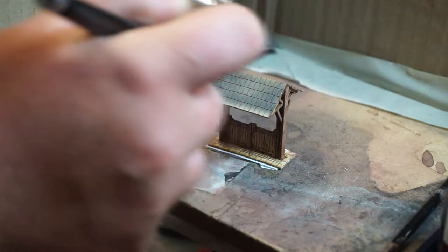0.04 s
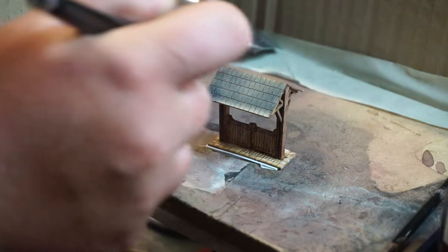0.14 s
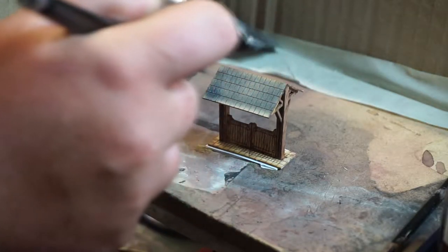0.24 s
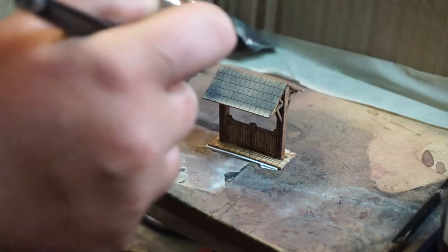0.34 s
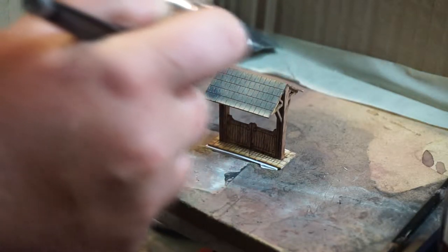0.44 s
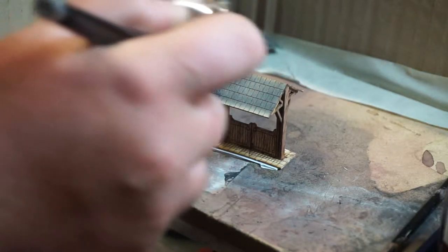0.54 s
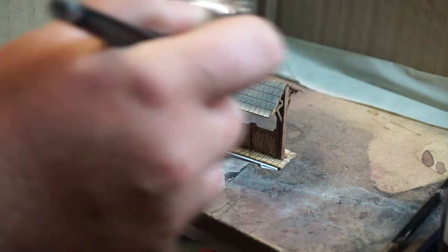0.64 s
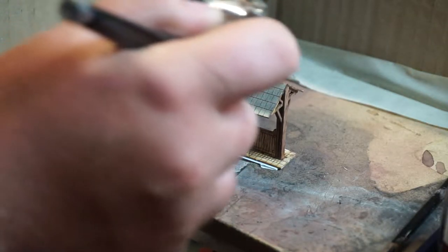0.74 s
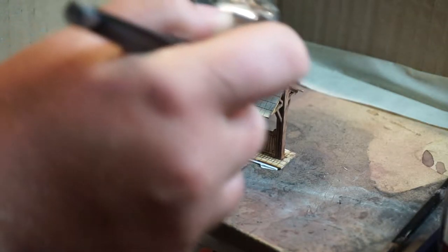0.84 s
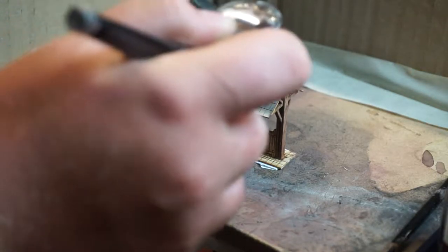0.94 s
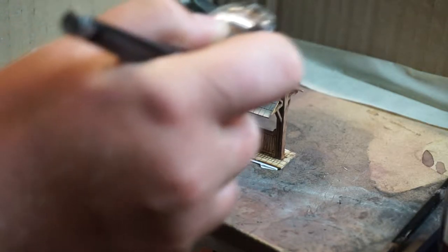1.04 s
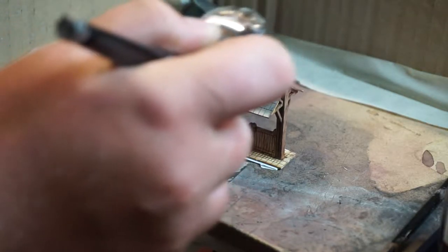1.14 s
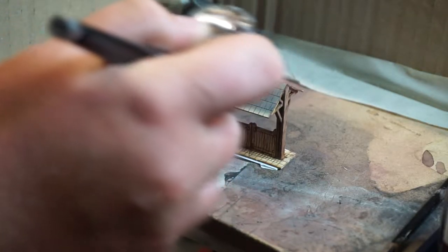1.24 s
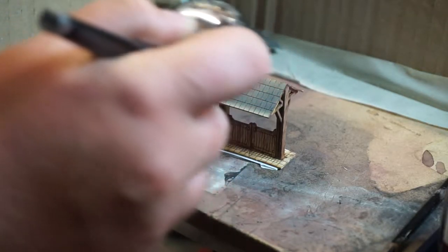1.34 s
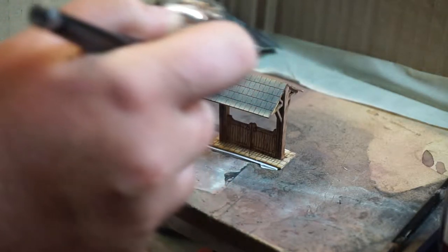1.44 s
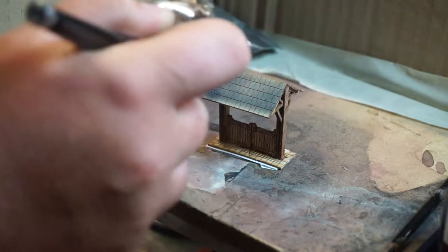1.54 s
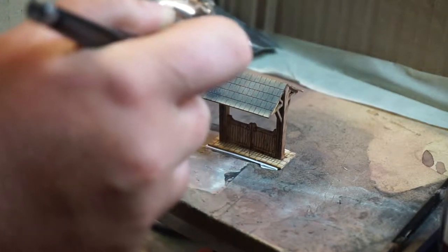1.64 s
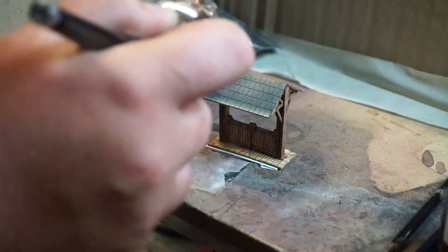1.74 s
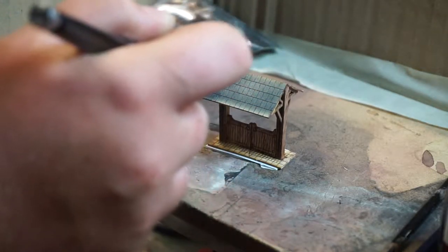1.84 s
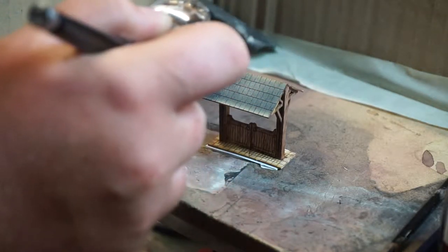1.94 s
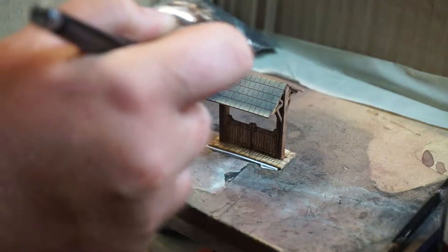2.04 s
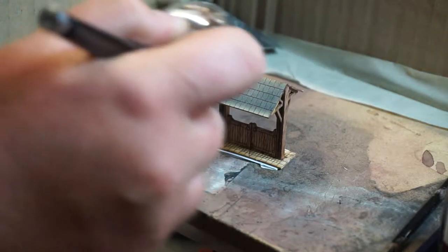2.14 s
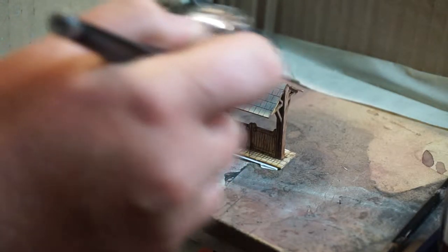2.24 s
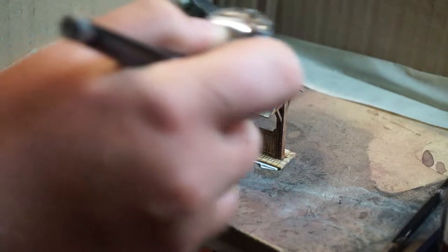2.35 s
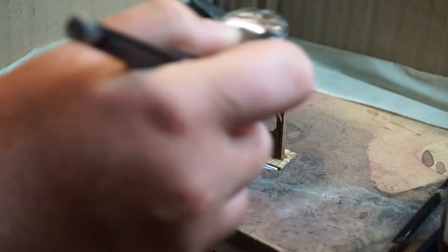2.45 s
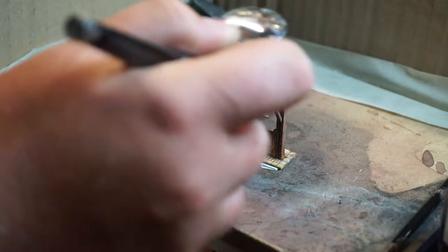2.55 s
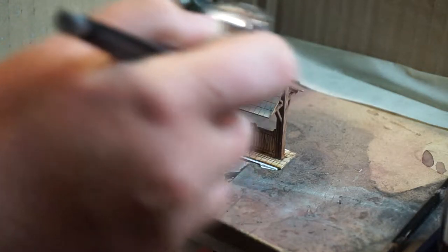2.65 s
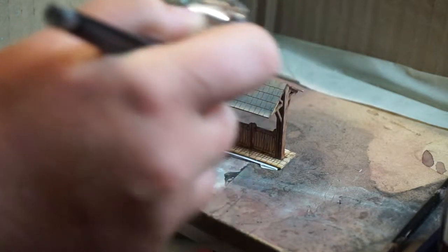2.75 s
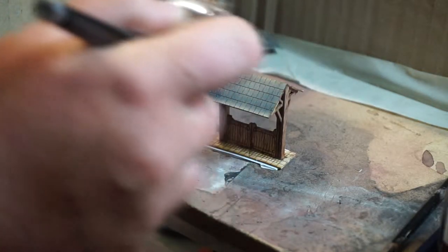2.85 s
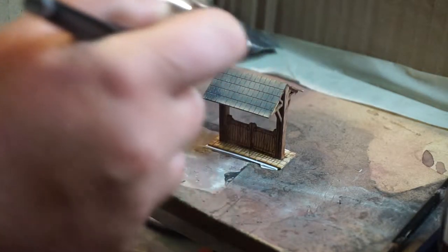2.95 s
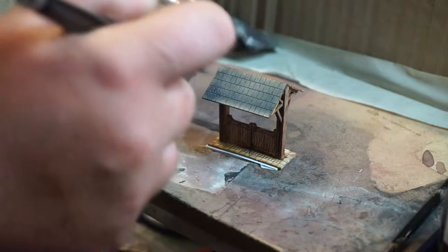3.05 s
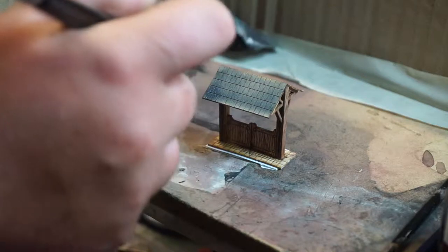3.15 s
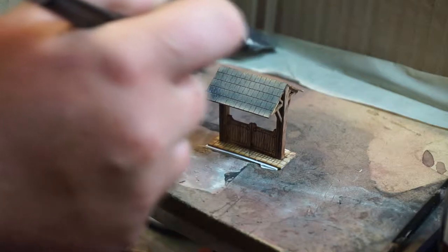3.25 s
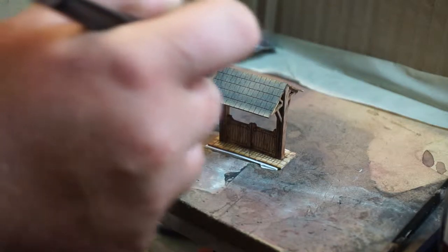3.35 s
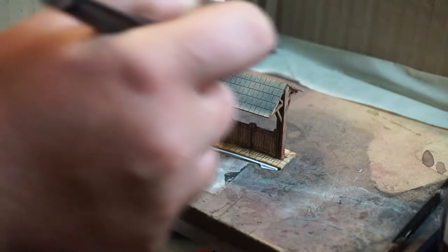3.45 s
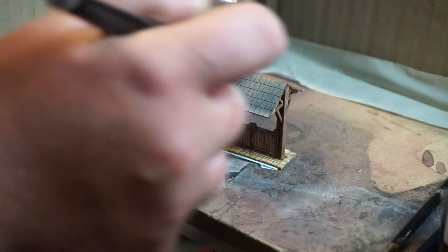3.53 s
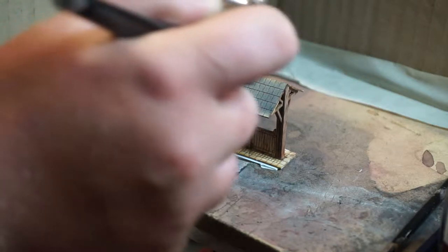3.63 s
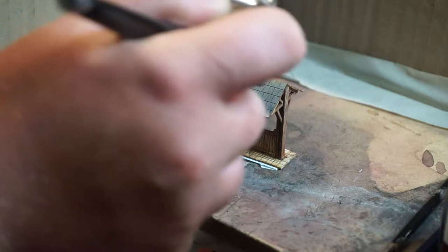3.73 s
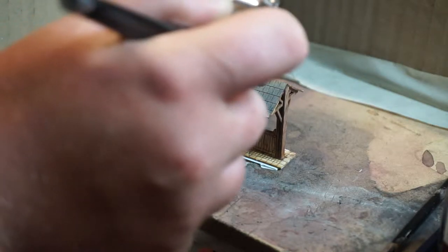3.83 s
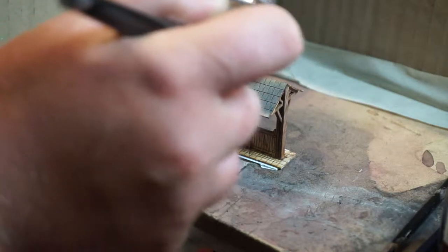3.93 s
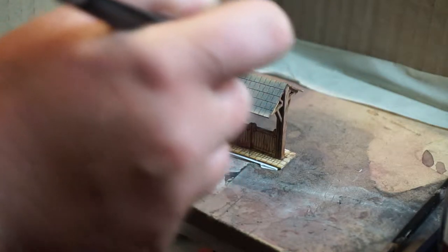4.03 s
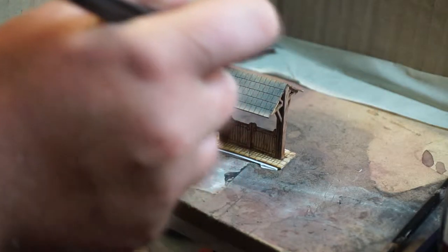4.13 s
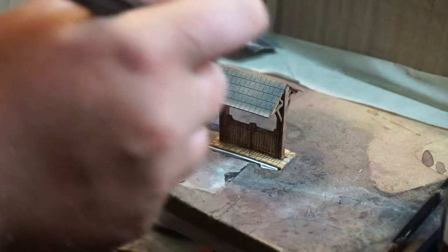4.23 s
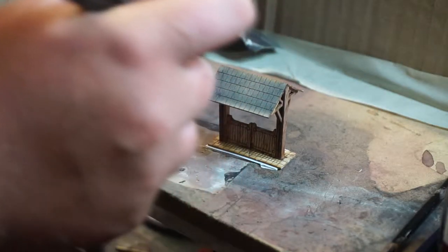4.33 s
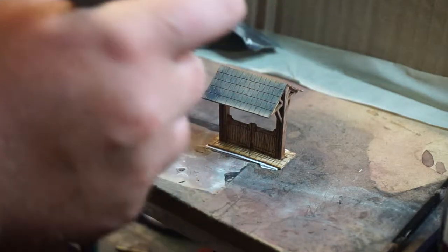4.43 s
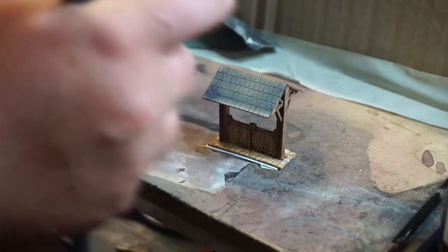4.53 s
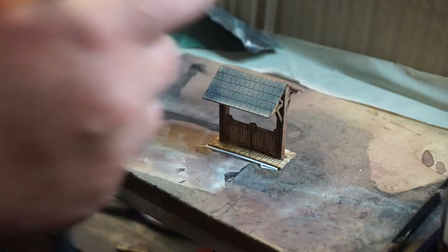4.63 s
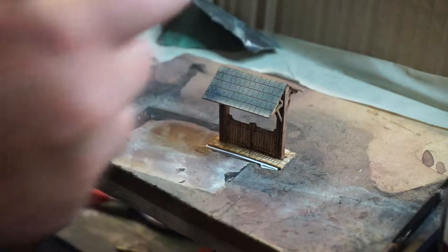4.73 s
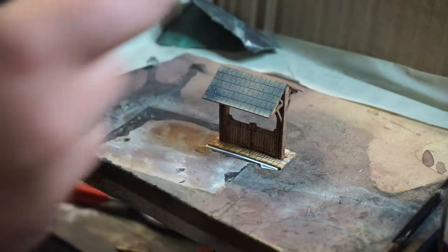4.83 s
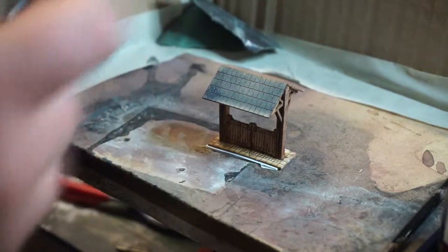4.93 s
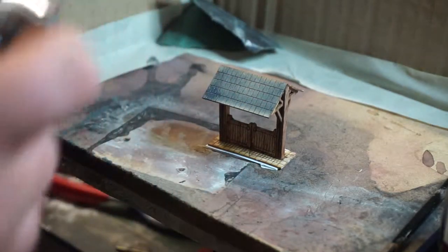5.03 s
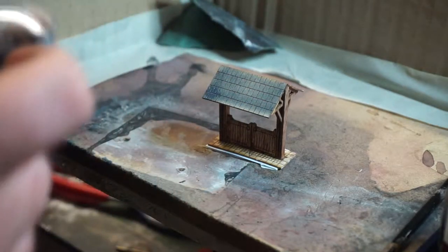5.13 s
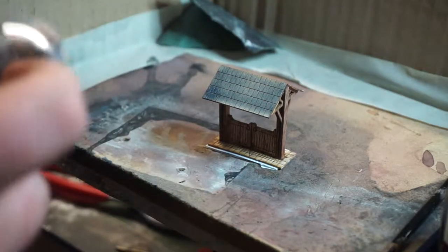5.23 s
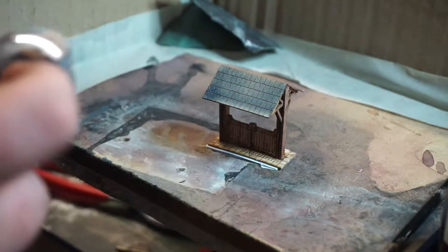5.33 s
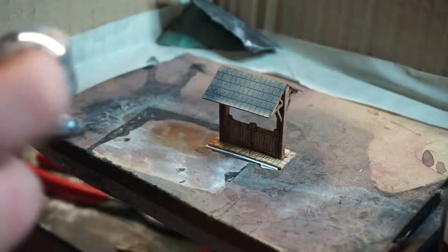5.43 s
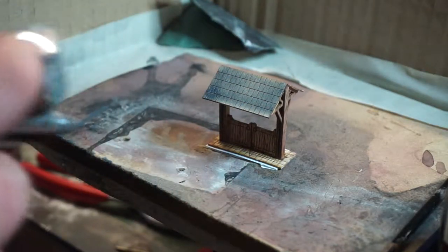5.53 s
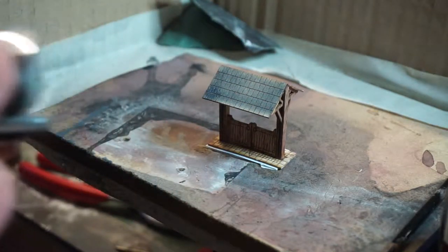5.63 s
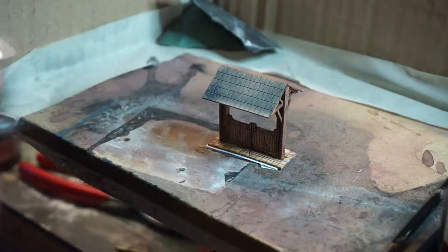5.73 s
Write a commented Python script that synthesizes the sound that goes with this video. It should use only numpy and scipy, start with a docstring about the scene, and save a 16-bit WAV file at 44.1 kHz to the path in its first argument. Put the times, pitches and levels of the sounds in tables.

```python
"""An airbrush paints a small model on a hobby bench, with a piston compressor humming a little to the right.
The jet is coloured noise that flares where it strikes the model and throbs with the piston; walls echo it.
The pump is a sum of shaft harmonics. The trigger is let go, the pump labours against the closed line,
its pressure switch snaps, a relief valve chirps and bleeds, and the motor coasts down over a quiet room."""
import sys
import numpy as np
from scipy import signal
from scipy.fft import rfft, irfft
from scipy.io import wavfile

SR = 44100
rng = np.random.default_rng(int(sys.argv[2]) if len(sys.argv) > 2 else 0)


def transcribe(signal):
    """Save signal, clipped to [-1, 1], as a 16-bit WAV file at the path in sys.argv[1]."""
    frames = np.atleast_2d(signal).T
    limited = np.clip(frames, -1, 1)
    pcm = np.round(limited * 32767).astype(np.int16)
    wavfile.write(sys.argv[1], SR, pcm)


N = 254898
T = np.arange(N) / SR  # time, s
HZ = np.maximum(np.arange(N // 2 + 1) * SR / N, 1)  # frequencies of the noise spectra

CUTOUT_S = 4.857  # relief valve opens and motor starts to coast
# compressor: (time [s], shaft speed [Hz], level [dB])
PUMP = [(0.03, 57.94, -39), (2.11, 58, -38), (4.57, 58.09, -38), (4.84, 57.2, -35.5)]
# likeness of the machine and room noise at the left and right microphones: (frequency [Hz], likeness [0-1])
LOW_LIKENESS = [(60, 0.85), (250, 0.82), (600, .6), (1100, .35), (3000, .4)]


def undb(db):
    """Decibels to gain."""
    return 10 ** (np.asarray(db) / 20)


def unit(x):
    """Scale to rms 1."""
    return x / np.sqrt(np.mean(x ** 2))


def curves(rows):
    """The columns of a time table, sample by sample."""
    s, *columns = np.transpose(rows)
    return [np.interp(T, s, column) for column in columns]


def across(rows, hz):
    """The columns of a frequency table at the given frequencies, interpolated over log frequency."""
    f, *columns = np.transpose(rows)
    return [np.interp(np.log(hz), np.log(np.maximum(f, 1)), column) for column in columns]


def colour(rows):
    """Gain over frequency of a (frequency [Hz], relative level [dB]) spectrum."""
    return undb(across(rows, HZ)[0])


def resonances(rows):
    """Gain over frequency of steep-sided resonances that add in power."""
    power = 0
    for f, width, db in rows:
        detuning = (HZ ** 2 - f ** 2) / (HZ * width) / 2
        power = power + (undb(db) / (1 + detuning ** 2)) ** 2
    return np.sqrt(power)


def noise(gain, likeness):
    """Stereo noise of a given colour; the part common to both microphones has rms 1."""
    alike = np.clip(likeness, 0, .99)
    mid, side = rfft(rng.standard_normal((2, N))) * gain
    mid = irfft(mid, N)
    side = irfft(side * np.sqrt((1 - alike) / (1 + alike)), N)
    return np.array([mid + side, mid - side]) / np.std(mid)


def walk(rate):
    """Smooth chance of rms 1 that changes about rate times a second."""
    return unit(irfft(rfft(rng.standard_normal(N)) / (1 + (HZ / rate) ** 4), N))


def step(at_s, over_s):
    """A smooth rise from 0 to 1."""
    return .5 + .5 * np.tanh((T - at_s) / over_s)


def bell(x, centre, width):
    """A smooth hump of height 1."""
    return np.exp(-((x - centre) / width) ** 2)


def burst(at_s, decay_s):
    """A quick attack and an exponential tail."""
    return step(at_s, 0.0011) * np.exp(-np.maximum(T - at_s, 0) / decay_s)


def throb(turns, depth_db):
    """A gain of rms 1 that swells once a turn."""
    return unit(undb(depth_db * np.cos(2 * np.pi * turns)))


def airbrush(turns):
    """A bright free jet, and turbulence where it hits model and board; piston strokes ripple ring and wash."""
    # hollows of the model: (centre [Hz], width [Hz], relative level [dB])
    hollows = [(2150, 470, -5.5), (2410, 230, 1.5), (2790, 160, -2)]
    # air washing over the model's faces: (frequency [Hz], relative level [dB])
    wash_spectrum = [(700, -11), (1350, -11), (2300, -8), (3400, -1), (3950, -5.5), (4300, -1.5),
                     (4750, -2), (5200, 2.5), (5620, -1.5), (5790, 4), (5950, -5), (7200, -2.5), (9100, -3),
                     (10200, -11)]
    # free jet at the nozzle: (frequency [Hz], relative level [dB])
    nozzle = [(1500, -20), (4000, -16), (6500, -8.5), (8400, -1.5), (9700, 1), (10300, -1), (11000, 1.5)]
    # likeness of the air noise at the left and right microphones: (frequency [Hz], likeness [0-1])
    air_likeness = [(600, .7), (1200, 0.1), (2450, 1), (3250, 0.4), (4300, 0.3), (5400, 0.78), (7500, 0.7),
                    (11000, 0.18)]
    # resonance of the spill on the board: (centre [Hz], width [Hz], relative level [dB])
    board = [(1714, 290, 0)]
    # surges of the free jet as the trigger is pulled further: (time [s], half length [s], rise [dB])
    surges = [(2.097, 0.17, 3.3), (4.22, 0.11, 7.5)]
    release_s = 4.628  # trigger let go
    likeness, = across(air_likeness, HZ)
    ring_gain, wash_gain = contact()
    ripple = throb(turns - .15, depth_db=1.0)
    flutter = walk(35)
    # levels are those of the direct air, ahead of the booth
    ring = noise(resonances(hollows), likeness) * ring_gain * undb(-2.4 + .7 * flutter) * ripple
    wash = noise(colour(wash_spectrum), likeness) * wash_gain * undb(1.0 + .64 * flutter) * ripple
    # the spill grows .35 dB for each dB of ring
    spill = noise(resonances(board), likeness) * ring_gain ** .35 * undb(-36 + 1.2 * flutter)
    surge_db = sum(db * bell(T, s, length) for s, length, db in surges)
    jet = noise(colour(nozzle), likeness) * undb(-38.5 + surge_db + .46 * walk(22))
    return (ring + wash + spill + slips(likeness) + jet) * (1 - step(release_s, 0.0072))


def contact():
    """How hard the jet plays on the model, as gains of ring and wash: passes and flares add in power."""
    # passes across the model, levels before the trims in airbrush:
    # (onto it [s], off it [s], wash over its faces [dB], ring of its hollows above the wash [dB])
    passes = [(-0.1, 0.264, -43.5, 6.5), (0.426, 0.956, -45.6, 8), (1.041, 2.415, -42.5, 7),
              (2.638, 3.038, -45, 7.5), (3.268, 4.394, -44.0, 5.3)]
    # flares as the jet meets a part squarely, levels before the same trims:
    # (time [s], half length [s], wash [dB], ring above the wash [dB])
    flares = [(0.2, 0.021, -36, 5.5), (0.484, 0.019, -34, 3.5), (0.871, 0.027, -39, 8.0),
              (1.048, 0.08, -46.5, 10), (1.292, 0.11, -37.5, 4), (1.562, 0.094, -41.5, 3.5),
              (1.905, 0.095, -37.5, 0), (2.21, 0.11, -31, 4.5), (2.984, 0.019, -38, 7.1),
              (3.328, 0.02, -40.5, 12), (3.734, 0.023, -47.5, 13.5), (4.205, 0.1, -37.0, 2.9)]
    edge_s = .021  # time the jet takes to cross an edge of the model
    touches = []
    for on, off, db, ring_db in passes:
        touches.append((step(on, edge_s) * (1 - step(off, edge_s)) * undb(db), ring_db))
    for s, length, db, ring_db in flares:
        touches.append((np.sqrt(bell(T, s, length)) * undb(db), ring_db))
    ring = np.sqrt(sum((gain * undb(ring_db)) ** 2 for gain, ring_db in touches))
    wash = np.sqrt(sum(gain ** 2 for gain, _ in touches))
    # a little air still grazes the model between passes
    return np.hypot(ring, undb(-56)), np.hypot(wash, undb(-51.8))


def slips(likeness):
    """The jet slips past the model: short, hollow roars of resonant noise on the bare board."""
    # roars, levels ahead of the booth: (time [s], half length [s], level [dB], centre [Hz])
    roars = [(0.78, .2, -50, 1330), (0.87, .03, -43, 1700), (1.08, .06, -42, 1680), (2.72, .08, -47, 1380),
             (3.33, .02, -41, 1720), (3.82, .13, -48, 1300)]
    width_hz = 300
    total = 0
    for s, length, db, hz in roars:
        roar = noise(resonances([(hz, width_hz, 0)]), likeness)
        total = total + roar * undb(db) * np.sqrt(bell(T, s, length))
    return total


def booth(air):
    """Echoes off the board and the spray booth walls comb the hiss; the combs drift as the hand moves."""
    # nozzle's height over the board: (time [s], lag of the echo off it [ms])
    hand = [(0, .61), (.9, .635), (2.3, .62), (3.9, .61), (4.6, .56)]
    # walls of the spray booth: (mean lag to the left [ms], mean lag to the right [ms], echo level [dB])
    walls = [(1.55, 1.9, -22), (3.35, 3.6, -20), (5.2, 2.9, -15.5), (7.1, 7.6, -10), (10.3, 9.2, -11),
             (13.4, 14.6, -12.5)]

    def late(channel, ms):
        return np.interp(T - ms / 1000, T, channel)

    board_ms, = curves(hand)
    sway_ms = 0.047 * walk(1.0)
    channels = []
    for side, direct in enumerate(air):
        # the jet radiates with opposite sign towards the board
        heard = direct - undb(-15) * late(direct, board_ms)
        for wall in walls:
            heard = heard + undb(wall[2]) * late(direct, wall[side] + sway_ms)
        channels.append(heard)
    return np.array(channels)


def compressor(turns, level_db):
    """The piston puffs and its valves clatter; the tone hardens once the air has nowhere to go."""
    # pump tone with air flowing: (multiple of the shaft speed, relative level [dB])
    flowing_orders = [(1, 2), (2, -17.5), (3, -13), (4, -8.5), (5, -6.5), (6, -8), (7, -5.5), (8, -15.5),
                      (9, -28), (10, -2), (11, -4), (12, -7), (13, 1), (14, 2), (15, -15.5), (16, -4.5),
                      (17, -13), (18, -18), (19, -7), (20, -18), (21, -14), (22, -15), (23, -20),
                      (24, -13.5)]
    # pump tone against the closed line: (multiple of the shaft speed, relative level [dB])
    blocked_orders = [(1, -3), (2, -34), (3, -22), (4, -18), (5, -16), (6, -8.5), (7, -5), (8, -14),
                      (9, -16.5), (10, -18), (11, -8.5), (12, 2.5), (13, -19), (14, -3.5), (15, -32),
                      (16, -18), (17, -15), (18, -24), (19, -14), (20, -30), (21, -32), (22, -38),
                      (23, -16.5), (24, -20), (25, -20)]
    # valve and casing noise: (frequency [Hz], relative level [dB])
    clatter_spectrum = [(25, -15.5), (60, -7.5), (120, -7), (220, -3), (330, -2.5), (470, -4.5), (650, 0),
                        (860, 2.5), (1050, -3), (1400, -7.5), (1900, -10), (2600, -5.5), (3300, -19),
                        (11000, -26.5)]
    uneven = turns + .0015 * walk(25)
    flowing = pump_tone(flowing_orders, uneven, intake_db=-2, intake_turn=.35,
                        housing_hz=735, housing_width_hz=280, smear=.62)
    blocked = pump_tone(blocked_orders, uneven, intake_db=-4, intake_turn=.42,
                        housing_hz=620, housing_width_hz=270, smear=-.14)
    pressure = step(4.67, 0.013)
    tone = undb(1.0) * ((1 - pressure) * flowing + pressure * blocked)
    stroke_gain = undb(.25 * walk(30))
    clatter = undb(-7.5) * noise(colour(clatter_spectrum), across(LOW_LIKENESS, HZ)[0])
    running = 1 - step(4.88, 0.026)
    return (tone * stroke_gain + clatter) * undb(level_db) * running


def pump_tone(orders, turns, intake_db, intake_turn, housing_hz, housing_width_hz, smear, size=2048):
    """Intake and delivery strokes ring the housing each turn; smear is the treble's extra lag in turns."""
    # where the pump is heard: (frequency [Hz], left minus right [dB], lead of the left [rad])
    pump_place = [(60, 0, 0), (340, 0, 0), (410, -3, 0), (520, -2, -.5), (600, -8, 0), (695, -5, -.7),
                  (755, -1, 1.1), (812, -4, .7), (870, 4, .7), (940, -5, -.2), (1080, -11, -.5),
                  (1300, -2, 0)]
    k, db = np.transpose(orders)
    hz = k * np.mean(np.array(PUMP)[:, 1])
    strokes = 1 + undb(intake_db) * np.exp(2j * np.pi * k * intake_turn)
    # the housing takes a moment to ring up and to die away
    housing = 1 / (1 + 2j * (hz - housing_hz) / housing_width_hz) ** 2
    lag = np.angle(strokes * housing) - np.pi * smear * k ** 2 / len(k)
    pan_db, lead = across(pump_place, hz)
    cycle = np.arange(size) / size
    channels = []
    for side in (1, -1):  # left, right
        phase = 2 * np.pi * np.outer(k, cycle) + (lag + side * lead / 2)[:, None]
        channels.append(undb(db + side * pan_db / 2) @ np.cos(phase))
    level = np.std(np.mean(channels, axis=0))
    return np.array([np.interp(turns, cycle, channel, period=1) for channel in channels]) / level


def pressure_switch():
    """The pressure switch snaps: a short burst of resonant noise."""
    # switch resonances: (centre [Hz], width [Hz], relative level [dB])
    switch = [(3140, 350, 1), (4010, 120, 7.5), (4700, 240, 0), (7700, 1300, -9), (10000, 600, -3)]
    return undb(-40) * noise(resonances(switch), .4) * burst(4.853, decay_s=.012)


def relief_valve():
    """The valve chirps upward as it opens, its body rings, and a fading bleed hisses until it reseats."""
    # valve body: (centre [Hz], width [Hz], relative level [dB])
    valve = [(920, 130, 1), (1115, 70, -7), (1340, 70, -11)]
    # bleeding air: (frequency [Hz], relative level [dB])
    bleed_spectrum = [(200, -27), (480, -6), (665, 1), (900, -13), (1500, -13), (2150, -18), (2620, -4),
                      (3100, -19), (3700, -19.5), (4700, -27.5), (8000, -28), (8600, -21.5), (9400, -28.5),
                      (11000, -25.5)]
    start_hz, end_hz, rise_s = 815, 960, .025
    tail_s, reseat_s = .07, 5.39
    fade_db_per_s = 35
    since = np.maximum(T - CUTOUT_S, 0)
    hz = end_hz + (start_hz - end_hz) * np.exp(-since / rise_s)
    phase = 2 * np.pi * np.cumsum(hz * (1 + .007 * walk(120))) / SR
    tail = undb(-44) * step(CUTOUT_S, .003) * (1 - step(CUTOUT_S + tail_s, .022))
    opening = undb(-27.5) * burst(CUTOUT_S, decay_s=.013) + tail
    lean_db = np.array([[-1.5], [1.5]])  # left, right
    chirp = np.sqrt(2) * np.sin(phase) * opening * undb(.7 * walk(70) + lean_db)
    ring = undb(-40) * noise(resonances(valve), .4) * burst(4.856, decay_s=0.045)
    bleed_gain = undb(-49 - fade_db_per_s * since) * (1 - step(reseat_s, 0.039))
    bleed = bleed_gain * noise(colour(bleed_spectrum), 0.29) * step(CUTOUT_S, .01)
    return ring + chirp + bleed


def coasting_motor():
    """The rumble dies with the speed, and swells as the speed crosses the resonance of the mounts."""
    # motor rumble: (frequency [Hz], relative level [dB])
    rumble_spectrum = [(29, -41), (50, -8), (124, -12), (173, -9), (211, 1), (275, -5.5), (327, -1.5),
                       (347, -0.5), (368, -7.5), (509, -23), (664, -16), (800, -34.5), (1040, -55),
                       (1760, -120)]
    coast_s = .58  # time constant of the speed
    mount_hz, mount_width_hz = 23, 10
    slowing = np.exp(-np.maximum(T - CUTOUT_S, 0) / coast_s)
    speed = PUMP[-1][1] * slowing
    shake = undb(-45) * slowing ** 3.4 + undb(-54.5) * bell(speed, mount_hz, mount_width_hz)
    rumble = shake * noise(colour(rumble_spectrum), 0.98) * throb(np.cumsum(speed) / SR, depth_db=3.5)
    return rumble * step(CUTOUT_S, .01)


def knocks():
    """Light knocks and ticks around the bench, each a decaying burst of resonant noise."""
    # knocks: (time [s], level [dB], centre [Hz], width [Hz], decay [s])
    taps = [(4.585, -44, 400, 200, .014), (5.009, -46, 1200, 420, 0.015), (5.636, -70, 3000, 3000, .006),
            (5.774, -48, 2600, 500, .02)]
    total = 0
    for s, db, hz, width, decay in taps:
        total = total + undb(db) * noise(resonances([(hz, width, 0)]), .6) * burst(s, decay)
    return total


def rustle():
    """The hand draws back with a faint rustle of band-limited noise."""
    centre_hz, width_hz = 1620, 350
    return undb(-67) * noise(resonances([(centre_hz, width_hz, 0)]), .5) * step(5.7, .02)


def quiet_room():
    """Steady, mostly low noise lies beneath everything."""
    # room tone: (frequency [Hz], relative level [dB])
    room_spectrum = [(18, -47.5), (30, -21), (103, -10), (211, -0.5), (329, -6.5), (930, -23),
                     (1110, -19.5), (11000, -41), (14300, -79), (22000, -120)]
    return undb(-61.5) * noise(colour(room_spectrum), across(LOW_LIKENESS, HZ)[0])


def scene():
    """One shaft drives both the hum and the ripple in the air; a quiet room lies beneath."""
    speed, level_db = curves(PUMP)
    turns = np.cumsum(speed) / SR - .5
    air = undb(-1.5) * booth(airbrush(turns))
    shutdown = pressure_switch() + relief_valve() + coasting_motor()
    return air + compressor(turns, level_db) + shutdown + knocks() + rustle() + quiet_room()


def record(dry):
    """The recorder cuts the top steeply with an elliptic low-pass."""
    top_hz, ripple_db, stop_db = 10960, .1, 70
    low_pass = signal.ellip(12, ripple_db, stop_db, top_hz, fs=SR, output="sos")
    return signal.sosfilt(low_pass, dry)


dry = scene()
out = record(dry)
transcribe(out)
```